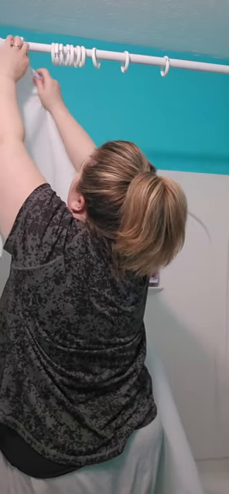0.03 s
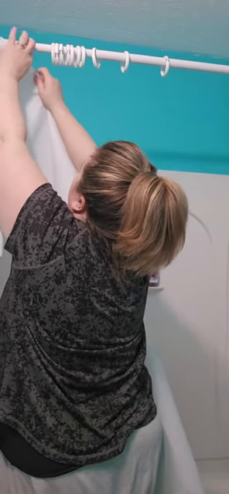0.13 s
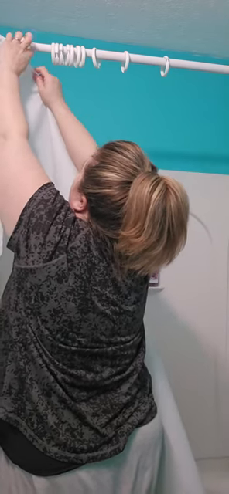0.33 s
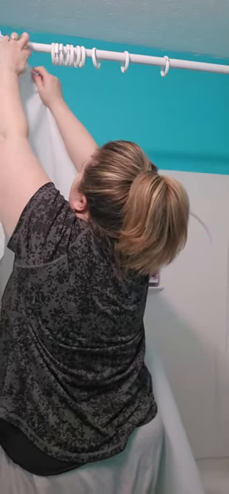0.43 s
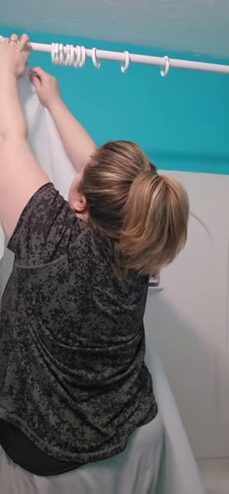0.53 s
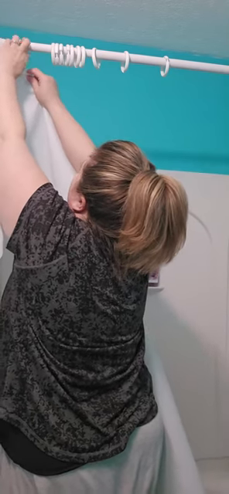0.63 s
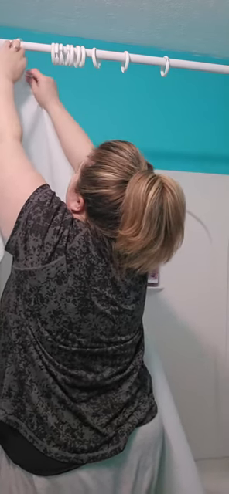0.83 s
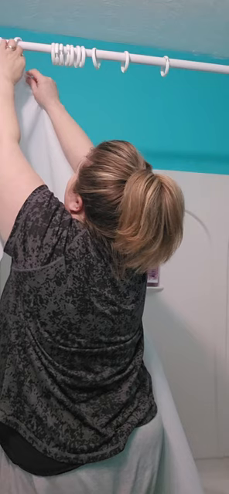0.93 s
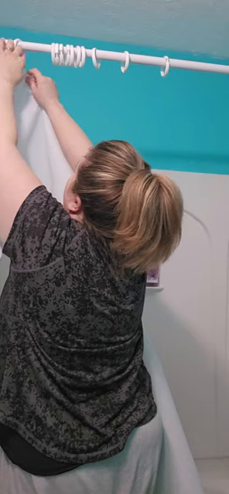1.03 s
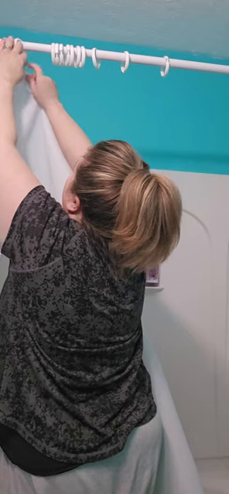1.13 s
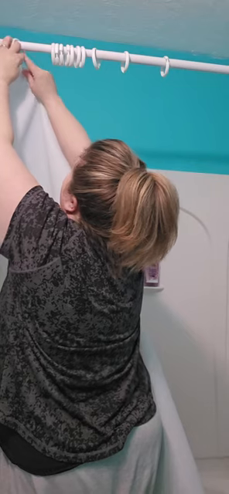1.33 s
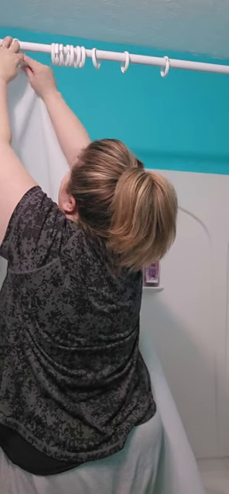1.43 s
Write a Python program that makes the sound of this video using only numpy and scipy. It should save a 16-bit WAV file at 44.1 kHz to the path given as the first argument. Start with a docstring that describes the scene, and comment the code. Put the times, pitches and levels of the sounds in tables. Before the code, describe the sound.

A plastic curtain ring creaks faintly, then snaps shut at about 0.2 seconds, with a brief metallic ringing from the rod and a low boom from the wall. It clicks lightly near 0.5 seconds. Around 1.2 seconds a ring knocks hollowly, followed by dull finger bumps. Soft cloth rustle and a low rumble continue throughout, heard from a distance in a small, hard-walled bathroom.

```python
"""A small, hard-walled bathroom, from a stereo pair set far enough back to hear mostly the room.
A curtain is being hooked onto plastic rings on a metal rod. One ring creaks under strain, snaps
shut and sets the rod ringing, then clicks as it settles; later a held ring knocks hollowly.
In between, cloth rustles, fingers bump softly and the wall booms over a low rumble."""
import sys
import numpy as np
from scipy import signal
from scipy.fft import rfft, irfft
from scipy.io import wavfile

SR = 44100
rng = np.random.default_rng(int(sys.argv[2]) if len(sys.argv) > 2 else 0)


def int16_out(signal):
    """Quantize to a 16-bit WAV file."""
    q = np.round(np.clip(np.atleast_2d(signal).T, -1, 1) * 32767)
    wavfile.write(sys.argv[1], SR, q.astype(np.int16))


N = 66150
T = np.arange(N) / SR
FFT_SIZE = 2 ** 17
HZ = np.maximum(np.arange(FFT_SIZE // 2 + 1) * SR / FFT_SIZE, 1)

# a ring's contacts with the rod: (time [s], level [dB], contact cut-off [Hz])
CLACKS = [(0.2049, -14.5, 2000), (0.215, -20.5, 3000), (0.2286, -10.5, 5000), (0.2338, -9, 8900),
          (0.235, -1, 19000), (0.2425, -8, 15100), (.266, -6, 2780), (.281, -4, 2350), (.302, -9, 2200)]
# spectrum of plastic on metal: (frequency [Hz], level [dB])
CLACK_COLOUR = [(60, -15), (130, 4), (300, 5.5), (500, -1), (750, -6.5), (1450, 4.5), (2000, 2),
                (3300, 2.5), (3700, 2.5), (4200, 3.5), (5200, -1), (5900, -8), (6600, 1.5), (7700, 4),
                (9000, -6), (9700, -3), (12000, -8), (14300, 5), (15500, -3)]
def ring_clacks():
    """A ring scrapes over the rod, snaps shut and rebounds."""
    return contacts(CLACKS, CLACK_COLOUR)


# modes of rod and ring: (frequency [Hz])
ROD_HZ = [964, 1005, 1728, 2537, 2569, 3198, 3925, 4133, 5200, 6538, 7222, 7278, 7620, 9600, 13798]
# each mode's ringing: (level [dB], t60 [s])
ROD_DECAYS = [(-34, 0.16), (-38, 0.12), (-47, 0.49), (-40, 0.34), (-43, 0.31), (-51, 0.39), (-35, 0.096),
              (-23.5, 0.055), (-38, 0.13), (-44, 0.11), (-31, 0.18), (-27, 0.15), (-34, 0.1), (-30, 0.048),
              (-30, 0.095)]
def rod_ringing(snap_s=.2355, swell_s=0.0075):
    """Rod and ring sing on after the snap; each mode reaches the two microphones out of step."""
    age, out = np.maximum(T - snap_s, 0), 0
    for hz, (db, t60) in zip(ROD_HZ, ROD_DECAYS):
        phase = rng.uniform(0, 2 * np.pi)
        skew = rng.uniform(np.pi / 8, np.pi / 3) * rng.choice([-1, 1]) * np.array([[1], [-1]])
        out = out + from_db(db) * decay(age, t60) * np.sin(2 * np.pi * hz * age + phase + skew)
    return out * (1 - np.exp(-age / swell_s))  # the ringing takes a moment to fill the room


# slips of the plastic: (time [s], level [dB])
CREAKS = [(.1355, -22), (.1395, -20), (.153, -24), (.1765, -17.5), (.1805, -14), (.197, -22), (.208, -17)]
# their thin, high spectrum: (frequency [Hz], level [dB])
CREAK_COLOUR = [(500, -37), (4300, -25), (5000, -5), (5350, 3), (5900, -3), (6500, 0.5), (7200, -7.5),
                (10000, -16.5), (15000, -23)]
def ring_creaks():
    """Plastic slips in tiny jerks under strain just before the snap."""
    return contacts(CREAKS, CREAK_COLOUR)


# light contacts: (time [s], level [dB])
CLICKS = [(0.4665, -22), (0.4718, -16.5), (0.4914, -29.5)]
# their spectrum: (frequency [Hz], level [dB])
CLICK_COLOUR = [(150, -24), (400, 7.5), (850, -13), (1400, 8.5), (3000, 0.5), (5000, 3.5), (6000, -1.5),
                (8000, 4), (10000, -6.5), (12500, -5.5), (14500, -5.5)]
# the ring's ping: (frequency [Hz], level [dB], t60 [s])
CLICK_MODES = [(2570, -42, .06), (7310, -19.5, 0.026)]
def ring_clicks():
    """The ring settles with light contacts, each starting a short ping."""
    return contacts(CLICKS, CLICK_COLOUR, CLICK_MODES)


# dull contacts: (time [s], level [dB])
KNOCKS = [(1.1721, -9.5), (1.191, -18.5)]
# their hollow spectrum: (frequency [Hz], level [dB])
KNOCK_COLOUR = [(60, -42), (130, -5), (250, 10.5), (450, -6.5), (680, 13), (950, -2), (1400, 0), (1610, 12),
                (1770, 11.5), (2150, -5), (3700, 2), (5300, -8.5), (7000, -20), (15000, -30)]
# the held ring's resonances: (frequency [Hz], level [dB], t60 [s])
KNOCK_MODES = [(667, -33.5, 0.049), (1624, -28, 0.059)]
def ring_knocks():
    """A held ring knocks, and its damped resonances die quickly."""
    return contacts(KNOCKS, KNOCK_COLOUR, KNOCK_MODES)


# finger contacts: (time [s], level [dB], contact cut-off [Hz])
BUMPS = [(.026, -28, 3020), (.096, -25.5, 4000), (.586, -14.5, 2020), (.712, -23.5, 3900),
         (.8615, -23, 1600), (1.1, -24.5, 2500), (1.235, -0.5, 350), (1.24, -17.5, 7000),
         (1.4055, -10, 1190)]
# their spectrum: (frequency [Hz], level [dB])
BUMP_COLOUR = [(60, -31), (150, -9.5), (300, -3), (550, 1.5), (800, -3.5), (1050, -1.5), (1500, 3),
               (2500, -6), (5000, -11), (15000, -16)]
def finger_bumps():
    """Fingers bump the rod and the cloth; the soft contact dulls the treble."""
    return contacts(BUMPS, BUMP_COLOUR)


# pushes on the wall: (time [s], level [dB], length [s])
WALL_PUSHES = [(.229, -6.5, 0.0036), (.259, 0.5, 0.0031), (.376, -9.5, 0.0034), (0.608, -24.5, 0.0031),
               (0.786, -25, 0.005), (1.335, -17.5, .003), (1.375, -17.5, 0.0028)]
# low modes of wall and room: (frequency [Hz])
BOOM_HZ = [77, 115, 140, 153, 201, 240, 276]
# each mode's ringing: (level [dB], t60 [s])
BOOM_DECAYS = [(-56, 0.7), (-39.5, 0.53), (-38.5, 0.26), (-45, .35), (-46, 0.17), (-53, 0.37), (-42, 0.3)]
def wall_boom(low_cut_hz=124):
    """Rod and hands push on the wall and wake its low modes and the room's."""
    force, boom = 0, 0
    for s, db, length in WALL_PUSHES:
        push = np.sin(np.pi * np.clip((T - s) / length, 0, 1)) ** 2
        force = force + from_db(db) * push / (push.sum() + 1e-9)
    for k, (hz, (db, t60)) in enumerate(zip(BOOM_HZ, BOOM_DECAYS)):
        boom = boom + (-1) ** k * resonate(force, [(hz, db, t60)])  # neighbours swing opposite ways
    return signal.sosfilt(signal.butter(2, low_cut_hz, "high", fs=SR, output="sos"), boom)


# the cloth's sliding hiss: (time [s], level [dB])
HISS_LEVEL = [(0, -77.5), (.1, -72.5), (.2, -65), (.42, -68), (.56, -62.5), (.66, -69), (.74, -71),
              (.78, -62), (.84, -68.5), (.94, -70.5), (.962, -60), (1.02, -65.5), (1.08, -71.5),
              (1.16, -63.5), (1.25, -57), (1.31, -65.5), (1.4, -62), (1.46, -59)]
# its spectrum: (frequency [Hz], level [dB])
HISS_COLOUR = [(1200, -28.5), (2500, -0.5), (3400, -5), (4600, 1), (6200, -6.5), (7400, -3), (10000, -16),
               (15000, -14.5)]
# the cloth's lower rubbing: (time [s], level [dB])
RUB_LEVEL = [(0, -71.5), (.07, -74), (.14, -68), (.4, -63.5), (.62, -66), (.74, -64), (.83, -72), (.9, -70),
             (1.06, -72.5), (1.15, -62.5), (1.25, -65.5), (1.31, -63), (1.43, -61), (1.5, -58)]
# its spectrum: (frequency [Hz], level [dB])
RUB_COLOUR = [(150, -8), (450, 5), (850, -4), (1500, 4), (2500, -2.5), (4000, -12.5), (10000, -34)]
def cloth_rustle(grains_per_s=250, spread_db=4, grain_db=-4, hiss_db=-2):
    """Fibres catch in tiny grains over a smooth sliding hiss and a lower rub."""
    sizes = from_db(spread_db * np.minimum(rng.exponential(1, N), 4)) * rng.choice([-1, 1], N)
    catches = sizes * (rng.random(N) < grains_per_s / SR)
    grains = rms_one(bathroom(coloured(catches, at_hz(HISS_COLOUR, HZ))))
    hiss = from_db(hiss_db) * diffuse_noise(HISS_LEVEL, HISS_COLOUR)
    rub = diffuse_noise(RUB_LEVEL, RUB_COLOUR)
    return from_db(grain_db) * level(HISS_LEVEL) * grains + hiss + rub


# background rumble: (time [s], level [dB])
RUMBLE_LEVEL = [(0, -65), (.08, -68.5), (.19, -69), (.27, -58), (.36, -65.5), (.46, -69), (.5, -63),
                (.56, -68), (.62, -71), (.69, -76), (.79, -61), (.84, -67.5), (.92, -63.5), (1.05, -71),
                (1.15, -64.5), (1.24, -55.5), (1.31, -63), (1.39, -57.5), (1.5, -68)]
# its spectrum: (frequency [Hz], level [dB])
RUMBLE_COLOUR = [(25, -30), (60, -24.5), (100, -17.5), (150, 5.5), (185, 0), (235, 5), (320, -11),
                 (600, -21), (2000, -52)]
def room_rumble():
    """Low noise of the room and of handling swells and sinks around the microphones."""
    return diffuse_noise(RUMBLE_LEVEL, RUMBLE_COLOUR)


# the bathroom's reverberation: (frequency [Hz], t60 [s])
ROOM_T60 = [(100, 0.21), (400, 0.45), (1500, 0.29), (4000, 0.31), (8000, 0.16), (15000, 0.2)]
def bathroom(x, direct_db=-16.5, right_lag_s=.00035, early_db=6, early_t60_s=0.17, bounce_db=-19):
    """A weak direct path to the pair, a burst of close reflections and a tail that dies band by band."""
    field, reverb = diffuse_spectrum(), 0
    centres = np.log([hz for hz, _ in ROOM_T60])
    for share, (_, t60) in zip(np.eye(len(centres)), ROOM_T60):
        band = irfft(field * np.interp(np.log(HZ), centres, share))[:, :N]
        fade = np.hypot(decay(T, t60), from_db(early_db) * decay(T, early_t60_s))
        reverb = reverb + band * fade / np.linalg.norm(fade)
    direct = np.array([tap(0, direct_db), tap(right_lag_s, direct_db)])
    delays_s = .012 * rng.random((2, 5))  # five bounces off the nearest walls to each microphone
    bounces = np.array([sum(tap(s, bounce_db) for s in side) for side in delays_s])
    return signal.fftconvolve(x[None], reverb + direct + bounces, axes=1)[:, :N]


# the room's sound across the pair: (frequency [Hz], left-right correlation [-1 to 1])
PAIR_CORRELATION = [(130, 0.88), (250, 0.56), (500, 0.77), (1000, -0.16), (2500, -0.11), (8000, 0.057),
                    (14000, 0.038)]
def diffuse_spectrum():
    """Spectrum of white stereo noise, alike in the bass and unrelated in the treble."""
    mid, side = rfft(rng.standard_normal((2, FFT_SIZE)))
    alike = np.clip(at_hz(PAIR_CORRELATION, HZ), -.99, .99)
    return (np.sqrt(1 + alike) * mid + np.sqrt(1 - alike) * side * [[1], [-1]]) / np.sqrt(2)


def diffuse_noise(curve, colour):
    """Smooth noise from all round the room, following a level curve."""
    white = irfft(diffuse_spectrum())[:, :N]
    return level(curve) * rms_one(coloured(white, at_hz(colour, HZ)))


def contacts(hits, colour, modes=()):
    """The crack of each contact plus the ringing of any modes it strikes."""
    force = sum(tap(*hit) for hit in hits)
    return coloured(force, at_hz(colour, HZ)) + resonate(force, modes)


def tap(s, db, cut_hz=None):
    """One impulse; a softer contact has a lower cut-off."""
    x = np.zeros(N)
    x[int(s * SR)] = from_db(db)
    if cut_hz is None:
        return x
    return signal.lfilter(*signal.butter(1, cut_hz, fs=SR), x + 1e-18)


def resonate(force, modes):
    """Decaying modes driven by a force."""
    out = 0
    for hz, db, t60 in modes:
        r, w = decay(1 / SR, t60), 2 * np.pi * hz / SR
        mode = signal.lfilter([0, np.sin(w)], [1, -2 * r * np.cos(w), r * r], force + 1e-18)
        out = out + from_db(db) * mode
    return out


def coloured(x, db):
    """Causal (minimum-phase) filter with the given gain at every frequency."""
    cepstrum = irfft(np.log(from_db(db)))
    cepstrum[1:FFT_SIZE // 2] *= 2
    cepstrum[FFT_SIZE // 2 + 1:] = 0
    return irfft(rfft(x, FFT_SIZE) * np.exp(rfft(cepstrum)))[..., :N]


def at_hz(points, hz):
    """Read a table on a log-frequency axis."""
    freqs, values = np.transpose(points)
    return np.interp(np.log(hz), np.log(freqs), values)


def level(curve):
    """Gain along a curve of (time [s], level [dB])."""
    return from_db(np.interp(T, *np.transpose(curve)))


def decay(age, t60):
    """Gain that falls 60 dB in t60 seconds."""
    return np.exp(-np.log(1000) * age / t60)


def from_db(db):
    """Decibels to gain."""
    return 10 ** (np.asarray(db) / 20)


def rms_one(x):
    """Scale to unit rms."""
    return x / np.sqrt(np.mean(x ** 2) + 1e-20)


def scene():
    """Rings, rod, hands and cloth as they reach the microphones."""
    handling = ring_clacks() + ring_creaks() + ring_clicks() + ring_knocks() + finger_bumps()
    return bathroom(handling) + rod_ringing() + wall_boom() + cloth_rustle() + room_rumble()


# mismatch of the microphones: (frequency [Hz], left minus right [dB])
PAIR_BALANCE = [(120, -2.5), (250, -2), (500, 1.5), (1200, 0.5), (2500, -0.7), (4500, -0.5), (7500, 2),
                (13000, 0)]
NOTCH_HZ, NOTCH_WIDTH_HZ, NOTCH_DB, CUTOFF_HZ = 10840, 330, -19.5, 15450
def record(dry):
    """Two slightly unlike microphones with a notch in the treble; the top is cut steeply."""
    notch_db = NOTCH_DB * np.exp(-.5 * ((HZ - NOTCH_HZ) / NOTCH_WIDTH_HZ) ** 2)
    lean_db = at_hz(PAIR_BALANCE, HZ) / 2
    pair = np.array([coloured(dry[0], notch_db + lean_db), coloured(dry[1], notch_db - lean_db)])
    return signal.sosfilt(signal.ellip(10, .2, 70, CUTOFF_HZ, fs=SR, output="sos"), pair)


dry = scene()
out = record(dry)
int16_out(out)
```